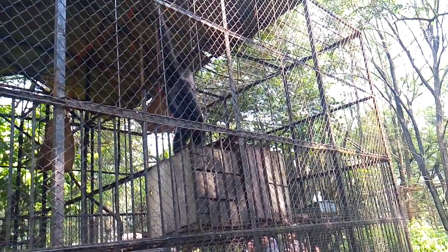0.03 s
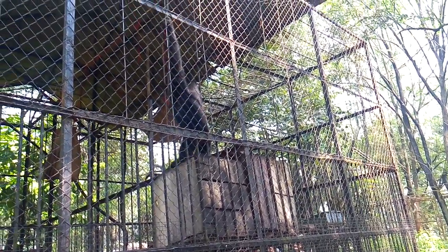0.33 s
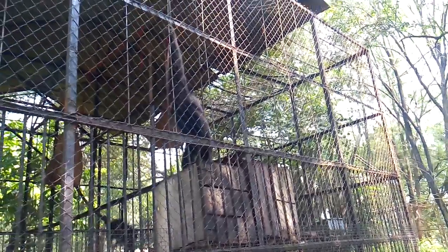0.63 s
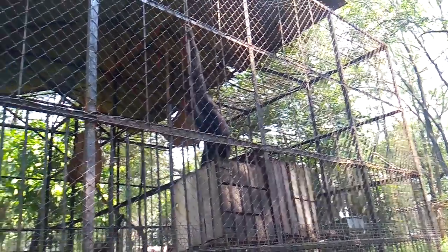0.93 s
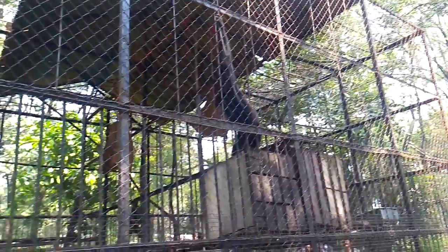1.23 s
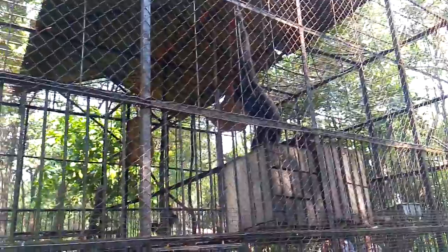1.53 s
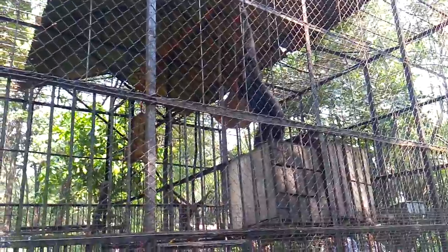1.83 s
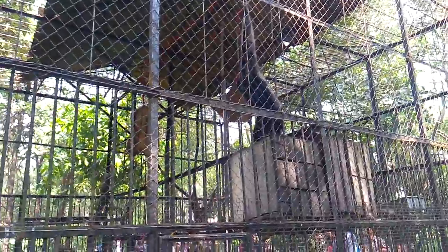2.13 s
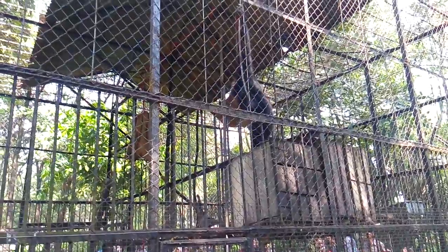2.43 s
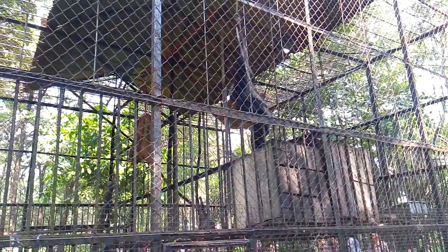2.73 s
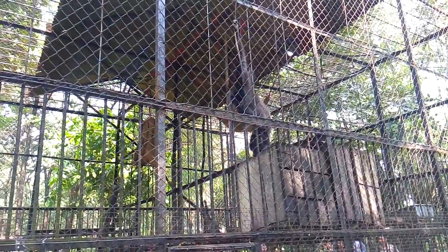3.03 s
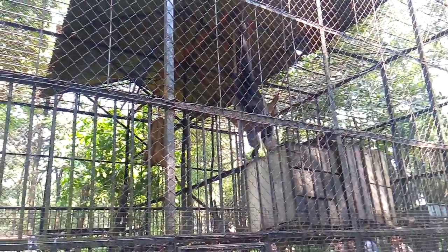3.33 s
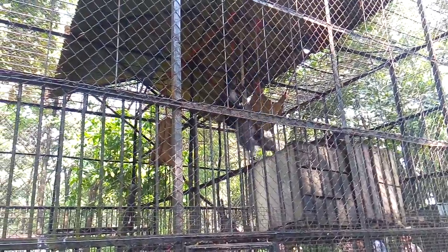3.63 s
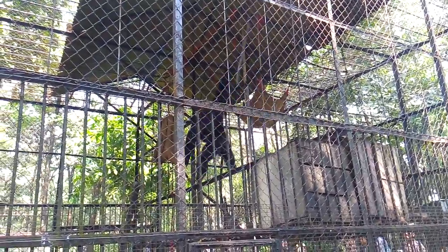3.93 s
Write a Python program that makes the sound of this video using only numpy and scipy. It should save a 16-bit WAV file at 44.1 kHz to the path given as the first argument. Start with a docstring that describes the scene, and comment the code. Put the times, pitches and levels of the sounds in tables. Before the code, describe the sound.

Harsh ape barks and low booms echo in a cage, rapid at first, then spaced out.

```python
"""Two siamangs bark in a roofed zoo cage, overlapping in quick turns, then one alone, slow and spaced.
Each bark is a pitch arch with two strong partials, harsh overtones and breath rasp.
Low booms of the throat sac come between; a distant ape hoots faintly over the outdoor air.
Roof and walls smear the calls, and the loudest overload the microphone."""
import sys
import numpy as np
from scipy import signal
from scipy.fft import rfft, irfft
from scipy.io import wavfile
from scipy.ndimage import uniform_filter1d, minimum_filter1d

SR = 44100
rng = np.random.default_rng(int(sys.argv[2]) if len(sys.argv) > 2 else 0)


def master_out(mix):
    """Clip the mix to full scale and print it as 16-bit PCM to the path in sys.argv[1]."""
    frames = np.transpose(np.atleast_2d(mix))
    ceiling = np.clip(frames, -1, 1)
    pcm = np.round(ceiling * 32767).astype(np.int16)
    wavfile.write(sys.argv[1], SR, pcm)


N = 176400

# breath noise spectrum, both voices: f/Hz, level/dB
BREATH_SPECTRUM = [(400, -1.5), (1000, 2.5), (1700, -0.5), (2300, 3), (3400, -2.5), (4200, 0.5),
                   (4750, -10), (5500, -0.5), (6800, 3.5), (8200, -4), (10000, -15), (12500, -25),
                   (15500, -45)]


def amp(db):
    return 10 ** (np.asarray(db) / 20)


def unit_rms(x):
    return x / np.sqrt(np.mean(x ** 2) + 1e-20)


def log_interp(points, hz):
    """Table value at hz, interpolated over log frequency."""
    f, value = np.transpose(points)
    return np.interp(np.log(hz + 1), np.log(f + 1), value)


def add(mix, start_s, sound):
    """Add sound in place, cropped to the mix."""
    at = round(start_s * SR)
    sound = sound[max(-at, 0):]
    part = mix[max(at, 0):][:len(sound)]
    part += sound[:len(part)]


def noise(spectrum, size=16384):
    """Unit-RMS noise shaped by a spectrum table."""
    gain = amp(log_interp(spectrum, np.fft.rfftfreq(size, 1 / SR)))
    return unit_rms(irfft(rfft(rng.standard_normal(size)) * gain, size))


def wobble(rate_hz, n, size=12288):
    """n samples of random drift, rolling off at rate_hz."""
    lowpass = np.exp(-(np.fft.rfftfreq(size, 1 / SR) / rate_hz) ** 2)
    return unit_rms(irfft(rfft(rng.standard_normal(size)) * lowpass, size))[:n]


def gate(t, length_s, attack_s, release_s):
    """Sine-squared attack, hold, release."""
    attack = np.sin(np.pi / 2 * np.clip(t / attack_s, 0, 1)) ** 2
    release = np.sin(np.pi / 2 * np.clip((length_s - t) / release_s, 0, 1)) ** 2
    return attack * release


def glide(length_s, from_hz, to_hz, level_db, swell_db=0):
    """Near-pure gliding tone with a weak octave: one boom or hoot."""
    t = np.arange(0, length_s, 1 / SR)
    progress = t / length_s
    hz = (from_hz + (to_hz - from_hz) * progress) * (1 + 0.009 * wobble(50, len(t)))
    phase = 2 * np.pi * np.cumsum(hz) / SR
    tone = np.sqrt(2) * (np.sin(phase) + amp(-20.5) * np.sin(2 * phase))
    swell = amp(level_db + swell_db * (progress - 1))
    return tone * swell * gate(t, length_s, attack_s=0.03, release_s=0.025)


def outdoor_air():
    """Steady background, mostly low frequencies."""
    # air noise density: f/Hz, level/dB
    air_spectrum = [(20, 3.5), (50, -11.5), (120, -4.5), (200, -7.5), (400, -9), (1000, -9.5),
                    (2500, -25.5), (7000, -47), (10000, -61), (16000, -65)]
    return noise(air_spectrum, size=N)


def sac_booms():
    """Low, nearly pure tones from the inflated throat sac."""
    # booms: t/s, length/s, start f/Hz, end f/Hz, end level/dB, swell from start to end/dB
    boom_calls = [(-.02, .11, 236, 292.3, -23, -18.5), (.244, 0.097, 251, 291, -5.5, 9.5),
                  (.33, .13, 276.7, 285, -16.5, -1), (.54, 0.12, 296.3, 278.7, -6, 0),
                  (.645, 0.075, 259, 271, -11, 0), (.786, 0.083, 304, 279, -11.5, -5.5),
                  (.97, 0.057, 290, 272, -14.5, -3.5), (1.04, .09, 285, 275.5, -19.5, -8),
                  (1.265, 0.1, 301, 265.4, -8, -1), (1.455, 0.086, 292, 286, -19.5, -9.5),
                  (1.648, 0.09, 245, 290, -8, 9), (1.83, 0.077, 291, 288.6, -16.5, 7.5),
                  (2.008, 0.098, 247.8, 294.7, -9.5, 6.5), (2.245, 0.08, 296, 282, -22, -4),
                  (2.3, 0.12, 249, 298, -17, -4), (2.656, 0.11, 239.4, 287, -5, 13.5),
                  (2.956, .098, 247, 286, -5.5, 12.5), (3.23, 0.092, 236.4, 260, -22, 3.5),
                  (3.308, 0.063, 269, 273.5, -2.5, 11), (3.59, 0.082, 254, 274.7, -20, 1),
                  (3.642, 0.064, 267, 271, -12, -2), (3.805, 0.17, 235.4, 240, -30, -5.5),
                  (3.94, 0.11, 244, 247.4, -11.5, 10.5)]
    track = np.zeros(N)
    for start_s, *call in boom_calls:
        add(track, start_s, glide(*call))
    return track


def lead_in(length_s, top_hz, level_db):
    """Soft, airy voicing ahead of a bark, about an octave above its starting pitch."""
    t = np.arange(0, length_s, 1 / SR)
    hz = 2 * 0.87 * top_hz
    tone = amp(-23) * np.sqrt(2) * np.sin(2 * np.pi * hz * t)
    breath = amp(-32) * noise(BREATH_SPECTRUM)[:len(t)]
    return amp(level_db) * (tone + breath) * gate(t, length_s, attack_s=0.0067, release_s=0.015)


def strong_partial(phase, flutter_depth):
    """Sine with random flutter in level and phase."""
    n, rate_hz = len(phase), 65
    flutter = wobble(rate_hz, n) + 1j * wobble(rate_hz, n)
    return np.sqrt(2) * (np.exp(1j * phase) * (1 + flutter_depth * flutter)).imag


def overtone(k, phase, hz, throat):
    """Flickering harmonic k, shaped by the throat; the highest ones wander in phase."""
    n, fray_hz = len(hz), 9500
    height = (k * hz / fray_hz) ** 4
    fray_rad = 2 * height / (1 + height) * wobble(250, n)
    level_db = log_interp(throat, k * hz) + 4 * wobble(26.3, n)
    return amp(level_db) * np.cos(k * phase + fray_rad + 2 * np.pi * rng.random())


def bark(throat, length_s, top_hz, end_hz, crest, level_db, octave_db, overtones_db, rasp_db):
    """Pitch scoops up, then falls in an S; two partials roughen, overtones give way to pulsed rasp."""
    t = np.arange(0, length_s, 1 / SR)
    progress, n = t / length_s, len(t)
    scoop = np.clip(1 - progress / crest, 0, 1)
    fall = np.clip((progress - crest) / (1 - crest), 0, 1)
    arch_hz = top_hz * (1 - 0.14 * scoop ** 2) + (end_hz - top_hz) * np.sin(np.pi / 2 * fall ** 0.9) ** 2
    hz = arch_hz * (1 + 0.0022 * wobble(300, n) + 0.005 * wobble(40, n))  # jitter, waver
    phase = 2 * np.pi * np.cumsum(hz) / SR

    flutter_depth = 0.25 * np.sqrt(fall)
    fundamental = strong_partial(phase, flutter_depth)
    octave = amp(octave_db) * strong_partial(2 * phase, 2.44 * flutter_depth)
    body = (fundamental + octave) * amp(0.5 * progress)
    body *= gate(t, length_s, attack_s=0.024, release_s=0.04)

    overtones = unit_rms(sum(overtone(k, phase, hz, throat) for k in range(3, 20)))
    overtones *= amp(overtones_db - 9 * progress ** 2) * gate(t, length_s, attack_s=0.029, release_s=0.04)

    rasp = unit_rms(noise(BREATH_SPECTRUM)[:n] * (1 + 0.9 * np.cos(phase)))
    rasp *= amp(rasp_db) * gate(t, length_s, attack_s=0.084, release_s=0.027)

    shimmer = 1 + 0.14 * wobble(83, n)
    return amp(level_db) * (body + overtones + rasp) * shimmer


def siamang_barks():
    """A higher and a lower voice, each with its own throat colour; the lower goes on alone."""
    # barks per voice: t/s, length/s, top f/Hz, end f/Hz, pitch crest/fraction of length,
    # level/dB, octave/dB, overtones/dB, rasp/dB
    high_barks = [(.093, 0.14, 746, 510, .34, -5.5, -3, -11, -20.5),
                  (.39, .142, 728, 517.5, .22, -8.5, -1, -9.5, -16.5),
                  (.642, 0.14, 707.3, 481.3, 0.29, -6.5, -5.5, -14, -17),
                  (.898, 0.097, 695.5, 488.7, 0.28, -9, -3, -10, -19.5),
                  (1.124, 0.12, 704.3, 485.4, 0.3, -7.5, -3.5, -15.5, -18.5),
                  (1.528, .105, 639.5, 429.6, 0.31, -11.5, -2.5, -8, -16),
                  (1.906, 0.11, 670, 443.5, 0.29, -12, -3.5, -12, -15),
                  (2.312, 0.1, 684, 482, 0.32, -13, -2.5, -9.5, -14.5)]
    low_barks = [(.036, 0.062, 587.2, 491, 0.52, -0.5, -6, -17.5, -23),
                 (.324, 0.094, 638, 496, 0.29, -5.5, -5.5, -25.5, -16.5),
                 (.726, 0.082, 633, 487, 0.314, -6, -4, -28, -15.5),
                 (.876, 0.12, 597.4, 493, 0.3, -6.5, -9, -20.5, -20),
                 (1.02, 0.085, 587.7, 482, .36, -7.5, -6, -18, -20.5),
                 (1.352, 0.11, 648, 469.4, 0.34, -6.5, -2.5, -13, -16.5),
                 (1.727, 0.1, 651.3, 474.4, 0.26, -5, -4.5, -14, -17),
                 (2.092, 0.11, 637.4, 478.5, 0.24, -6.5, -4, -16.5, -16),
                 (2.38, .094, 622.7, 461, 0.37, -5.5, -7, -24, -14.5),
                 (2.748, .112, 638.6, 482.5, .23, -8, -6, -18, -19),
                 (3.04, 0.099, 628.8, 495, 0.3, -8.5, -3, -21, -14),
                 (3.35, .1, 646.4, 488, 0.38, -10.5, -4.5, -15, -16),
                 (3.67, 0.097, 628, 496, 0.33, -9, -2, -17.5, -15.5)]
    # overtone envelope per throat: f/Hz, level/dB
    high_throat = [(1400, -7), (2000, -5), (2700, 2), (3400, 0), (4200, -0.5), (4900, -7), (6000, -7.5),
                   (7200, -4.5), (8500, -19.5), (10500, -25.5), (15500, -38)]
    low_throat = [(1400, -1.5), (1900, 2.5), (2550, 1.5), (3200, -1), (4000, -3), (4750, -6), (5400, -2.5),
                  (6500, 2.5), (8200, -4), (10000, -16.5), (15500, -34)]
    lead_s = 0.035
    track = np.zeros(N)
    for calls, throat in (high_barks, high_throat), (low_barks, low_throat):
        for start_s, length_s, top_hz, end_hz, crest, level_db, *timbre_db in calls:
            add(track, start_s - lead_s, lead_in(2 * lead_s, top_hz, level_db))
            add(track, start_s, bark(throat, length_s, top_hz, end_hz, crest, level_db, *timbre_db))
    return track


def distant_hoots():
    """Faint, short glides from a distant ape."""
    # hoots: t/s, length/s, start f/Hz, end f/Hz, level/dB
    hoot_calls = [(.28, 0.033, 833, 885, -13), (.56, 0.085, 865, 840, -36.5),
                  (1.27, 0.043, 856, 874, -25.5), (2.53, 0.13, 980, 800, -39.5),
                  (3.15, 0.083, 1445, 1565, -33.5), (3.46, 0.236, 887, 868, -42)]
    track = np.zeros(N)
    for start_s, *call in hoot_calls:
        add(track, start_s, glide(*call))
    return track


def cage_reverb(x):
    """Enclosure return: single echoes, dense early cluster, longer tail."""
    # first reflections off roof, hut and walls: delay/s, gain
    reflections = [(.0065, -0.24), (.0142, 0.033), (0.026, -0.18), (.037, 0.059), (.052, 0.15),
                   (.095, -0.013)]
    # tail decay: f/Hz, T60/s
    tail_t60 = [(250, 0.52), (600, 0.53), (1200, 0.71), (3000, 1), (7000, 0.96), (10000, 0.76),
                (15000, 0.1)]
    early_per_s, early_onset_s, early_t60_s, tail_rise_s = 3000, 0.012, 0.19, 0.01
    t = np.arange(SR) / SR
    early = rng.standard_normal(SR) * (rng.random(SR) < early_per_s / SR)
    early *= amp(-60 * t / early_t60_s) * (t > early_onset_s)
    hz, frame_s, bands = signal.stft(rng.standard_normal(SR), SR, nperseg=256)
    bands *= amp(-60 * frame_s / log_interp(tail_t60, hz)[:, None])
    tail = signal.istft(bands, SR, nperseg=256)[1][:SR] * np.minimum(t / tail_rise_s, 1)
    response = amp(-6.5) * early / np.linalg.norm(early) + amp(-10.5) * tail / np.linalg.norm(tail)
    for delay_s, gain in reflections:
        add(response, delay_s, np.array([gain]))
    return signal.fftconvolve(x, response)[:N]


def scene():
    """Mono mix: direct calls, cage return, outdoor air."""
    barks = siamang_barks()
    booms = sac_booms()
    hoots = distant_hoots()
    direct = amp(-1.5) * (barks + hoots) + booms
    reflected = cage_reverb(barks + hoots + amp(-1) * booms)
    return (direct + reflected + amp(-38) * outdoor_air())[None]


def record(dry):
    """Overload: fast limiter, clip at full scale, then low-pass."""
    limit, cutoff_hz = 1.077, 15800
    allowed_gain = np.minimum(1, limit / (abs(dry) + 1e-9))
    gain = uniform_filter1d(minimum_filter1d(allowed_gain, size=500), size=400)
    clipped = np.clip(dry * gain, -1, 1)
    lowpass = signal.firwin(511, cutoff_hz, window=("kaiser", 9), fs=SR)
    return signal.oaconvolve(clipped, lowpass[None], "same")


dry = scene()
out = record(dry)
master_out(out)
```